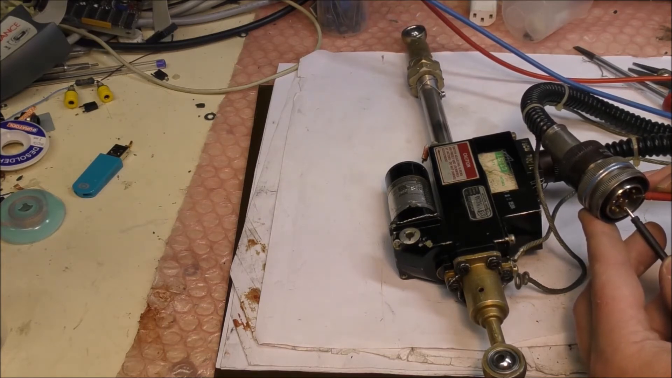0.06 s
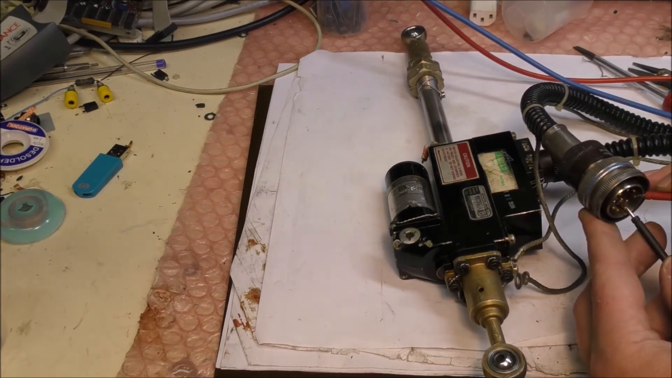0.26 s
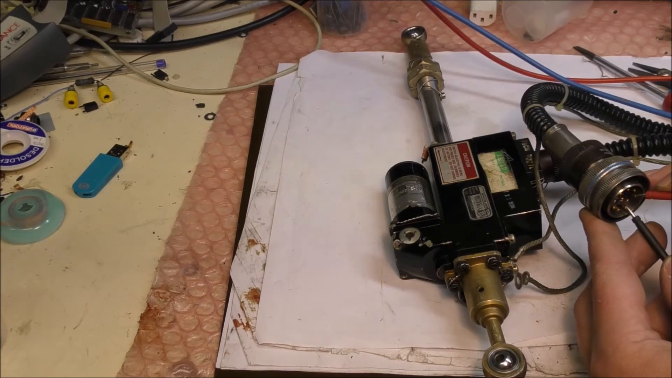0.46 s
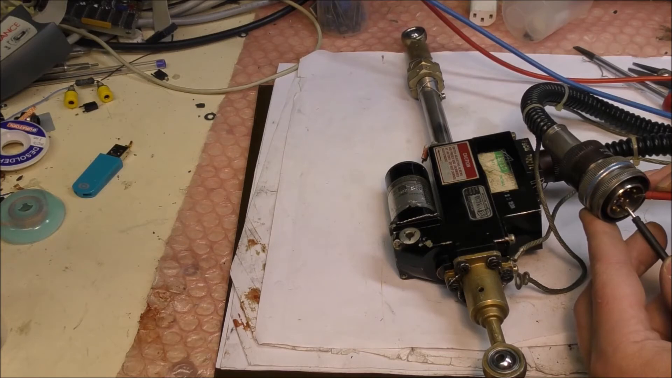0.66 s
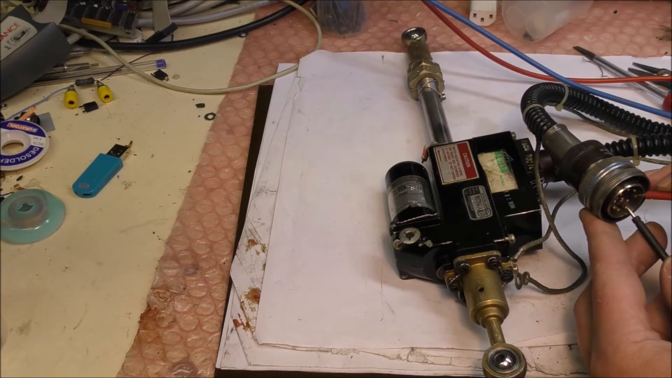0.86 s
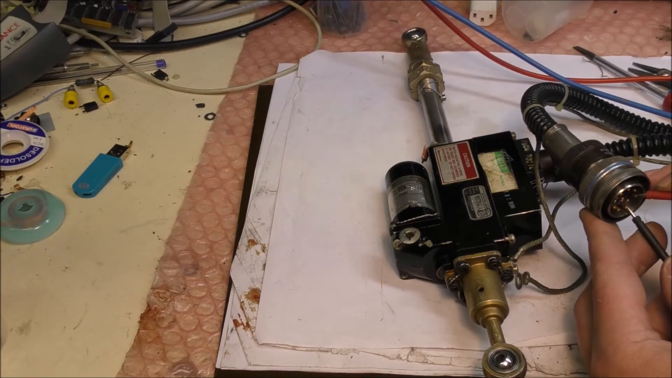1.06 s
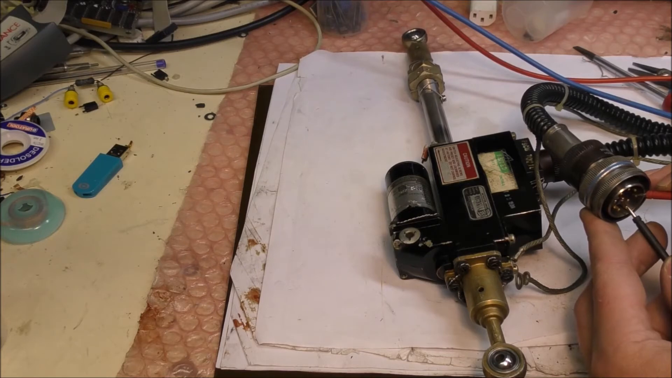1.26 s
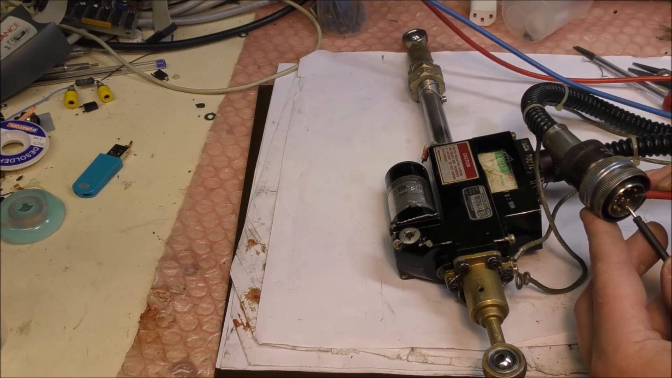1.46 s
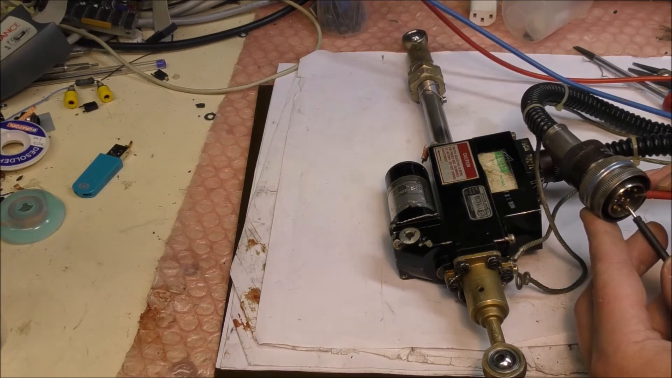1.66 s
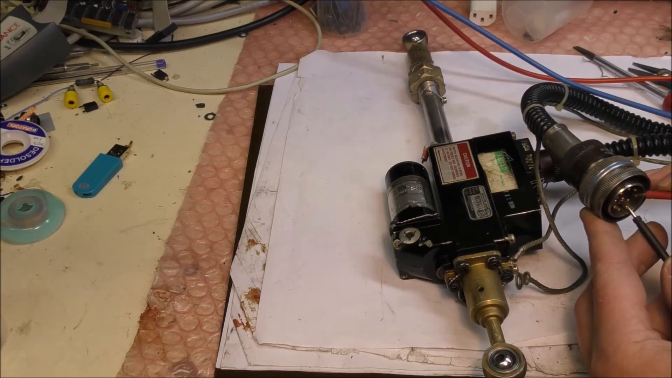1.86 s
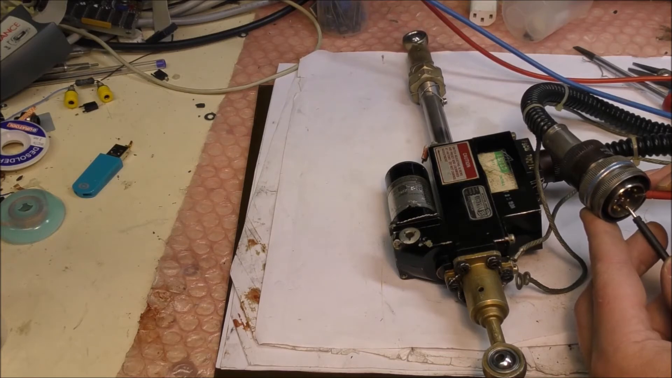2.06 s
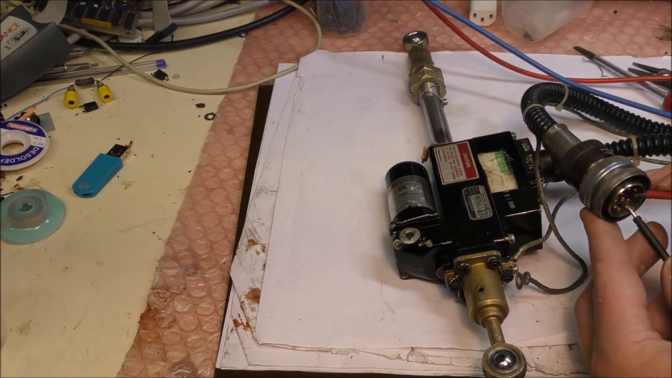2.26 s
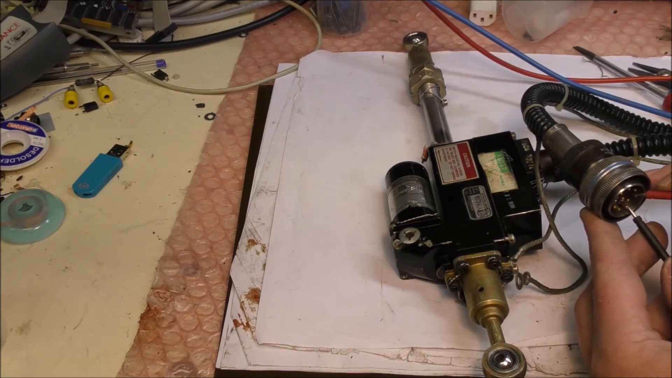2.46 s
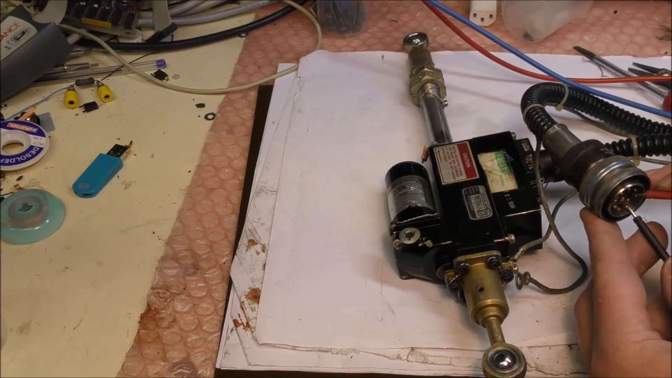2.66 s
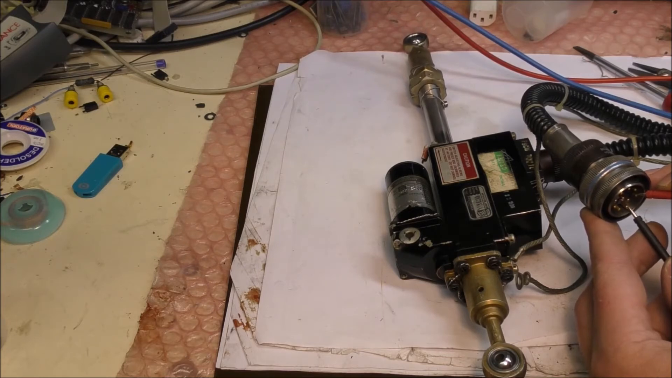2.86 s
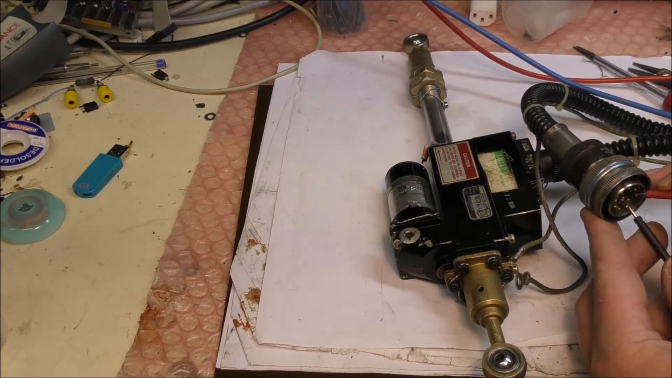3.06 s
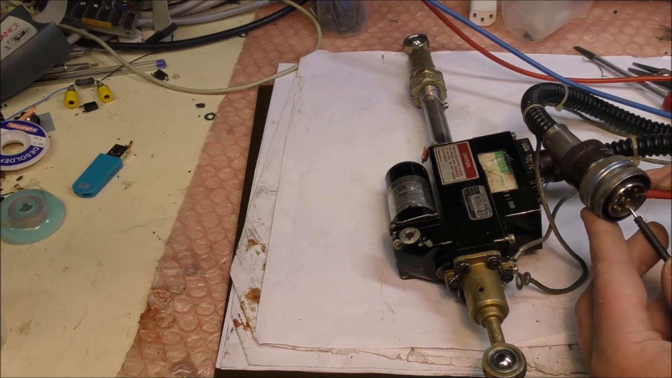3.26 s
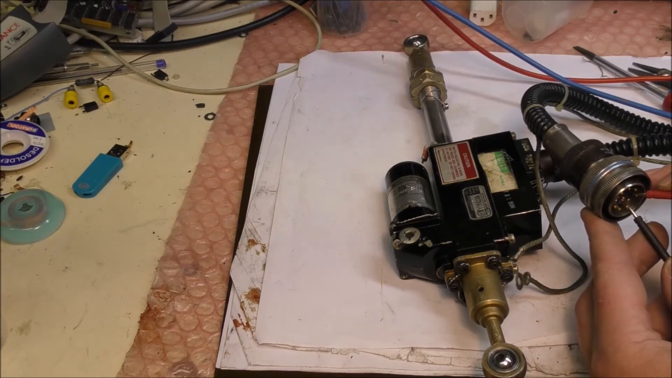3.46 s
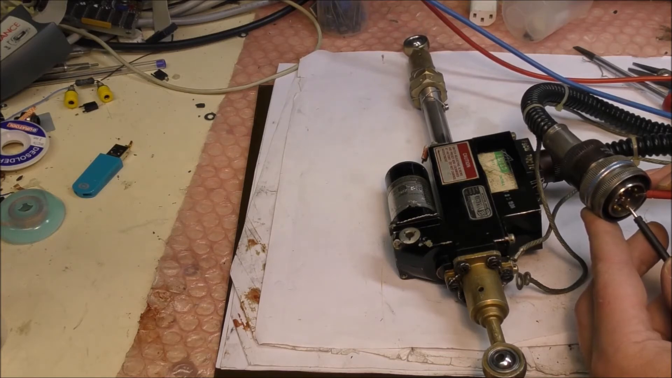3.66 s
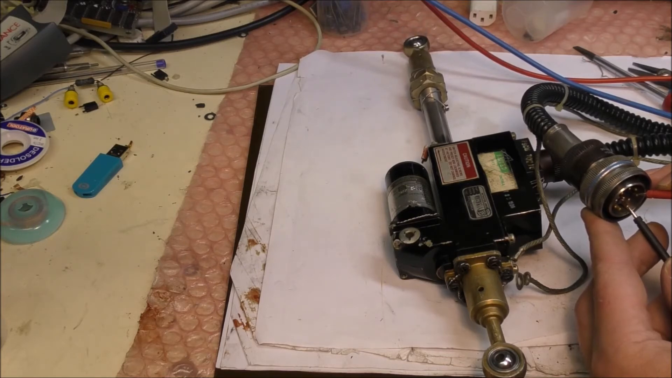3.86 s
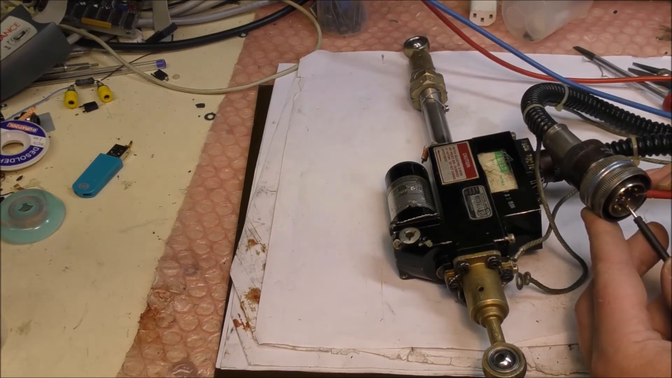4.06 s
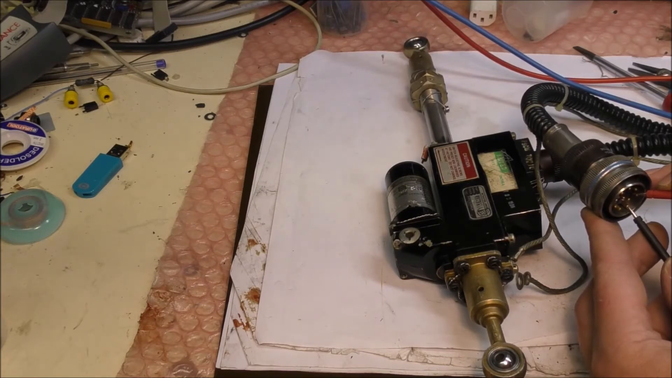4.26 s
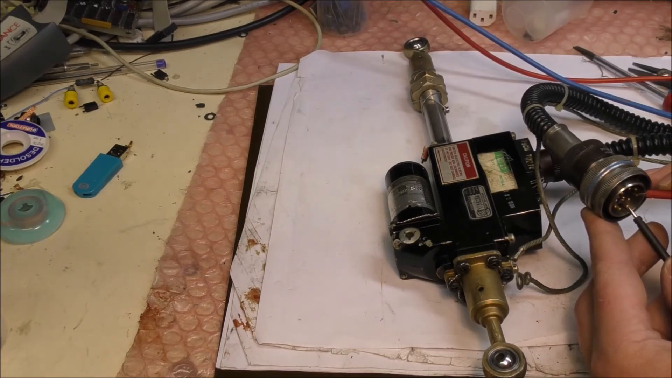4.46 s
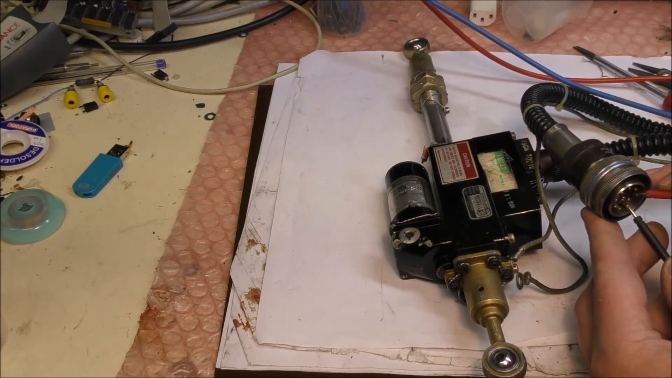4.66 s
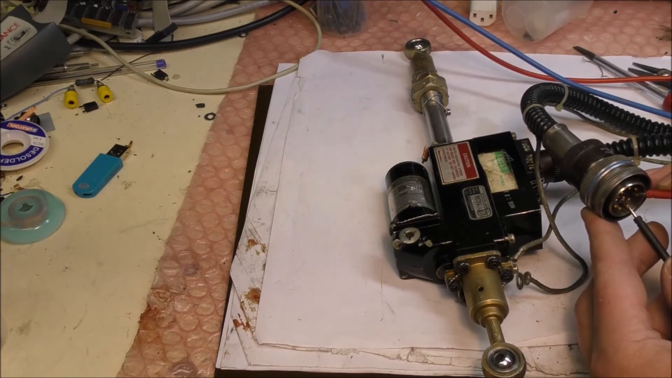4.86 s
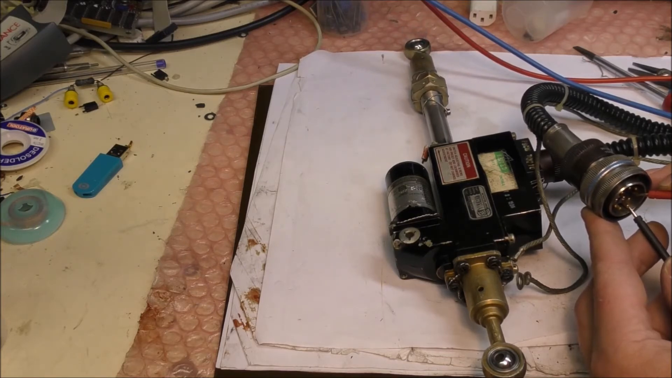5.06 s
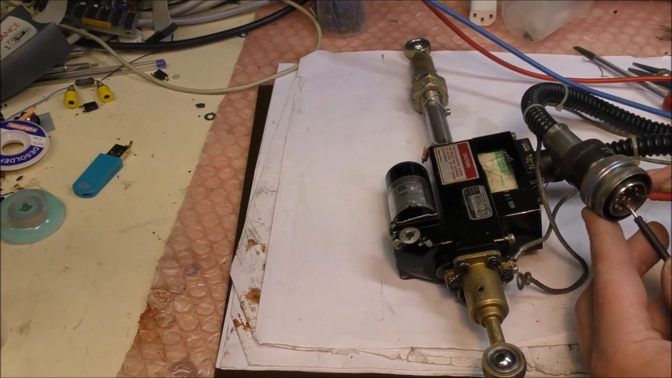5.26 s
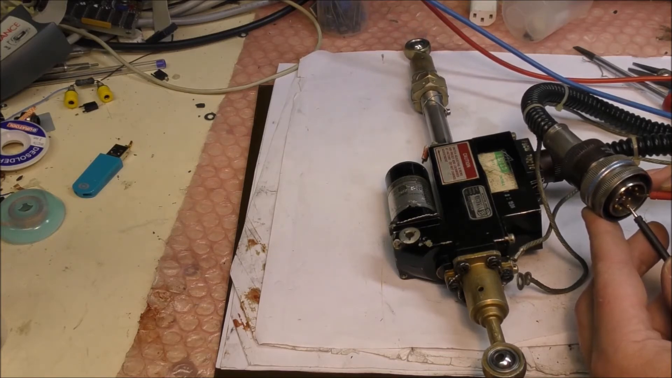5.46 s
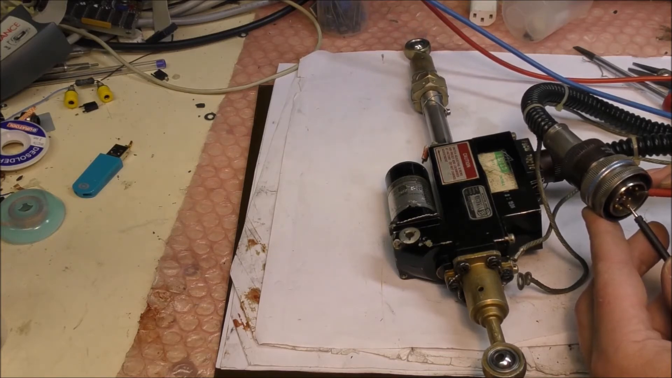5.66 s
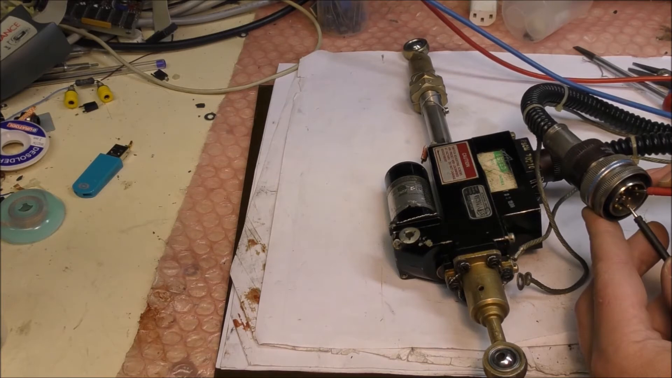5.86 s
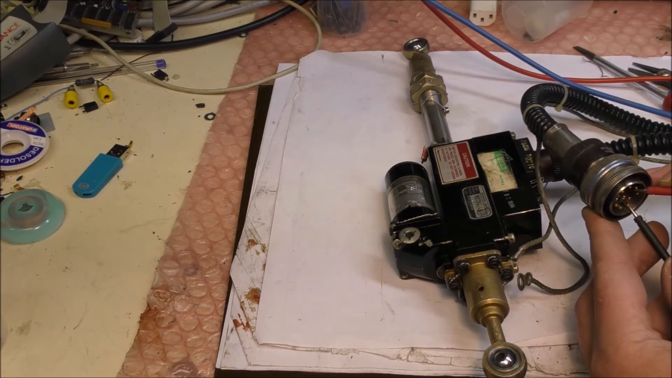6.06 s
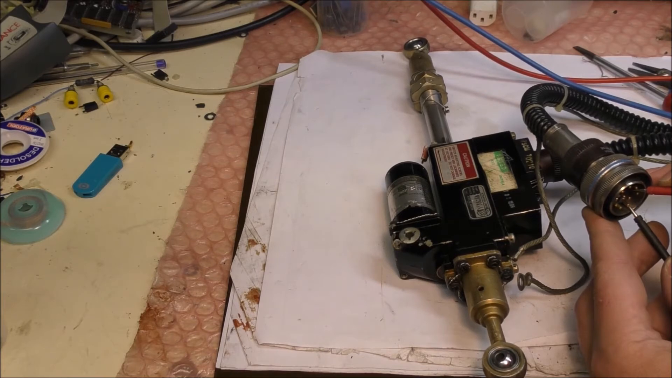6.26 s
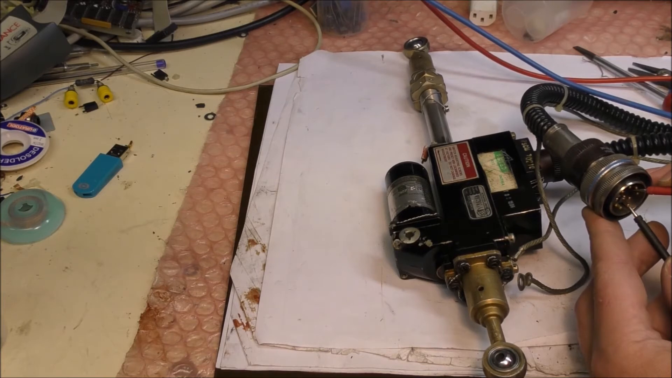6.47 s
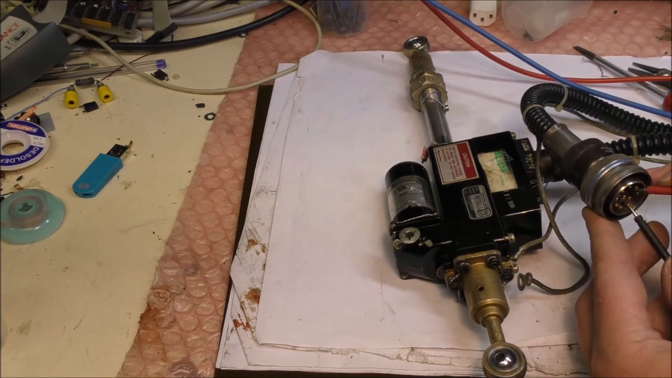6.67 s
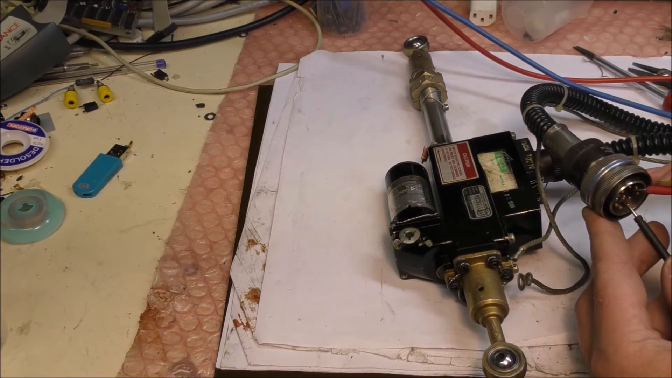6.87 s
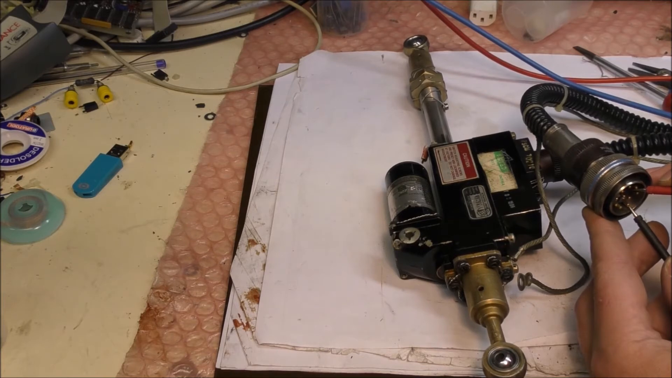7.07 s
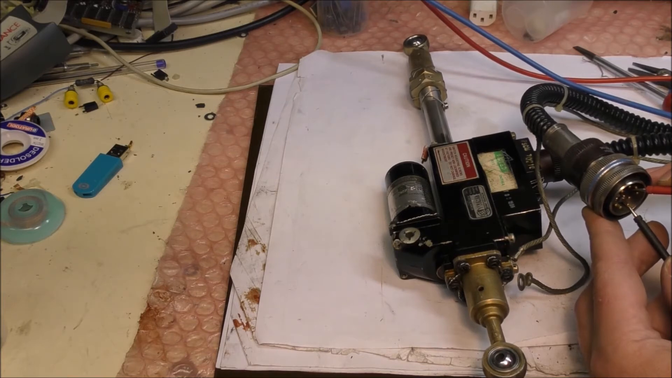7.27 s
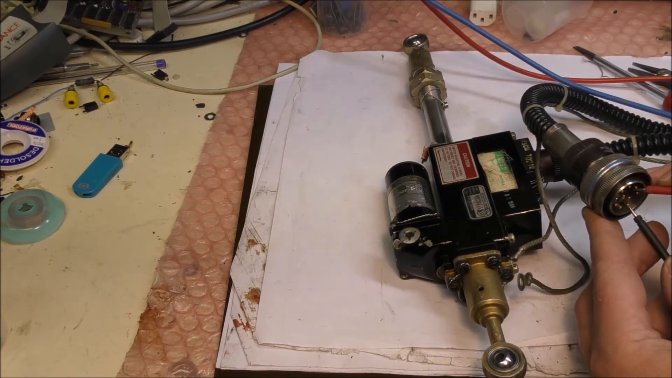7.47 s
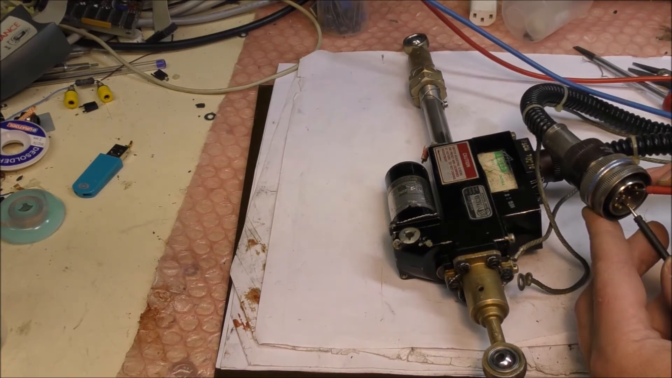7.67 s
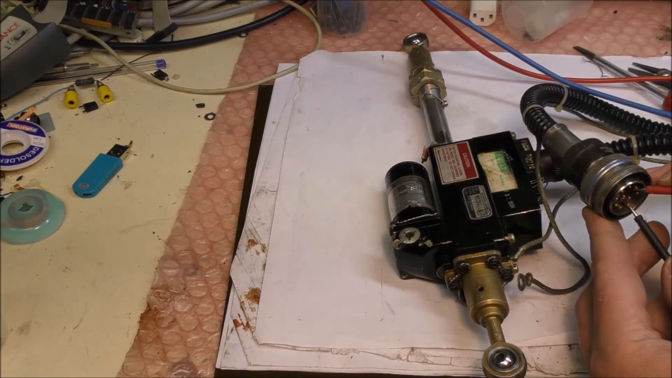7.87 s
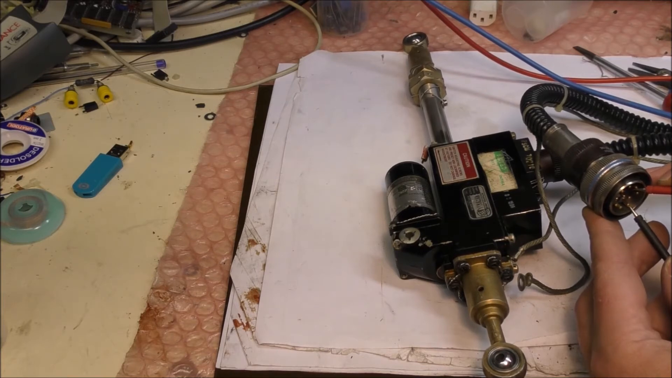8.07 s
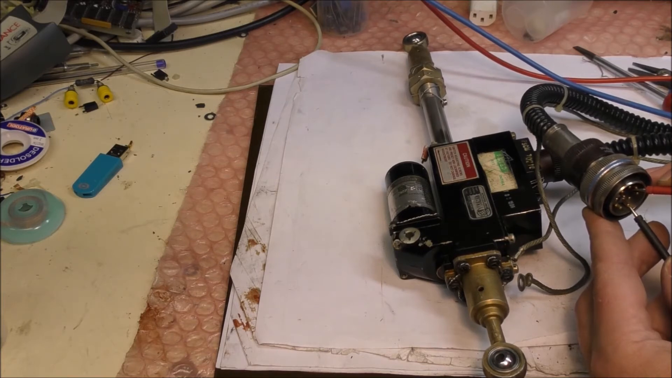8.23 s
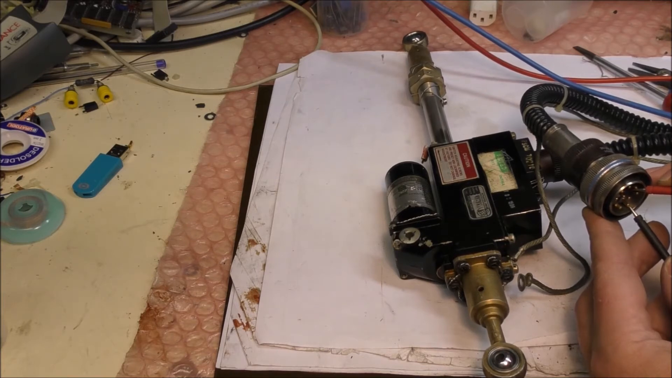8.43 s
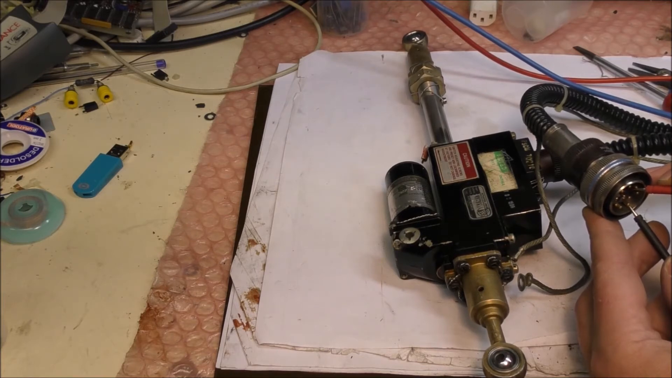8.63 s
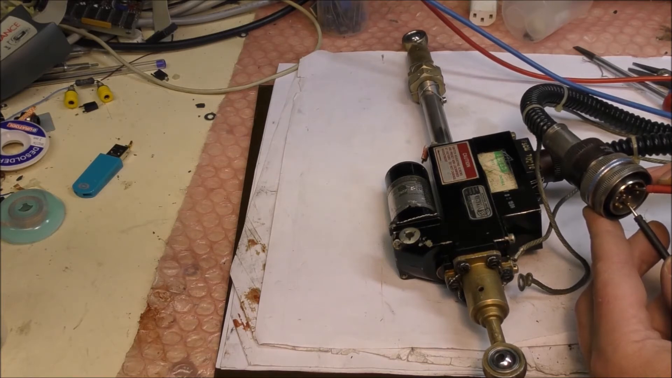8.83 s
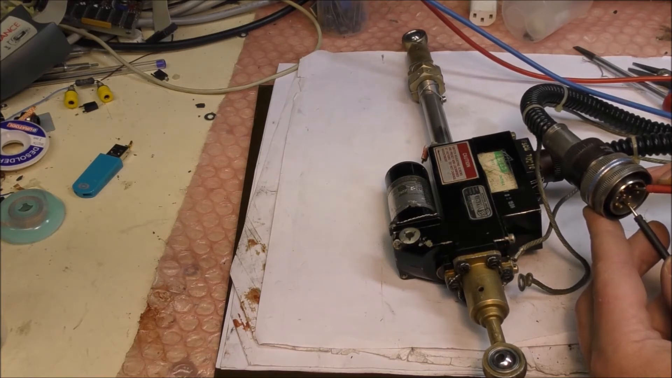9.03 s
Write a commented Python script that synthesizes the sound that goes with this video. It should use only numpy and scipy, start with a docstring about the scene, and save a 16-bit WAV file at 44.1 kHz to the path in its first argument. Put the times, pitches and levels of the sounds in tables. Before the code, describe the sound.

A small electric linear actuator whines close by on a workbench, already running, its nasal gear tone swaying about twice a second over rattle and brush fizz. Just before five seconds it brakes abruptly with several clacks, then a bright click. After a short quiet gap a knock starts it again; the whine climbs quickly and holds steady to the end. Small room, soft air.

```python
"""A small electric linear actuator on a workbench pulls its rod in, brakes, clicks, and after a pause pushes it out again.
A seven-tooth pinion on the motor shaft whines against a wheel four times its size: five tooth harmonics
cross sharp resonances while the speed sways with each turn of the screw.
Shaped noise makes the gear rattle and brush fizz, decaying modes and noise bursts the clacks and click;
a small workshop answers with a decaying noise echo under a soft rush of air."""
import sys
import numpy as np
from scipy import signal
from scipy.fft import rfft, irfft, next_fast_len
from scipy.io import wavfile
from scipy.ndimage import uniform_filter1d, map_coordinates

SR = 44100
rng = np.random.default_rng(int(sys.argv[2]) if len(sys.argv) > 2 else 0)


def waveform_to_disk(signal):
    """Save audio, clipped to [-1, 1], as 16-bit WAV at the path in sys.argv[1]."""
    frames = np.transpose(np.atleast_2d(signal))
    scaled = np.clip(frames, -1, 1) * 32767
    samples = np.round(scaled).astype(np.int16)
    wavfile.write(sys.argv[1], SR, samples)


N = 401310

# Weaker lines from the rotor and uneven teeth. Each row: multiple of the shaft rate,
# level in dB pulling, level in dB pushing, both before the stroke's gain.
ROTOR_LINES = [(4.94, -60, -63), (6.08, -61.5, -56), (8.97, -48.5, -47), (12, -53, -48.5), (13, -50, -46),
               (23, -54.5, -51), (25.1, -55, -45), (26, -37, -36), (27.04, -35, -46), (29, -55, -39),
               (31.35, -58, -40), (32.5, -61, -56), (32.9, -50.5, -54), (36, -48, -45.5), (42, -46, -44.5),
               (46.7, -58.5, -54), (48, -52.5, -57), (49.5, -48, -64), (51, -47.5, -69), (54.8, -52, -54),
               (56, -44, -46.5), (56.97, -43.5, -48), (69, -49, -39), (71.7, -50.5, -40.5), (72, -53, -63),
               (83, -55, -53), (86, -53.5, -56), (98, -49, -69)]
# Colour of the case shaken by the rattle. Each row: frequency in Hz, relative level in dB per Hz pulling,
# the same pushing.
CASE_COLOUR = [(40, -27, -28), (97, -19.5, -16), (150, -20, -18.5), (380, -25.5, -23), (580, -30.5, -32),
               (760, -18, -22), (938, -6.5, -3.5), (1340, -7, -4), (1650, -14.5, -13.5), (2050, 0.5, 0.5),
               (2256, -11, -8.5), (3310, -3, -1.5), (4060, 6, 7.5), (4210, -3, 0.5), (5320, 0.5, -1),
               (5790, -12, -9), (9100, -23, -21), (16000, -36.5, -40)]
# Colour of a metallic click. Each row: frequency in Hz, relative level in dB per Hz.
CLICK_COLOUR = [(500, -52.5), (850, -18), (1140, -1), (1400, -20), (1600, -11.5), (2830, -14), (3830, -6),
                (6310, -20.5), (8240, -9.5), (15500, -23)]

PINION_TEETH, WHEEL_RATIO = 7, 4
RATTLE_GROWS, FIZZ_GROWS = 0.64, 1.84  # power of the speed with which each grows


def amp(db):
    """Decibels to gain."""
    return 10 ** (np.asarray(db) / 20)


def unit(x):
    """Scale to rms 1."""
    return x / np.sqrt(np.mean(x ** 2) + 1e-20)


def along(points, hz):
    """Interpolate (Hz, value) points on a log frequency axis."""
    point_hz, values = np.transpose(points)
    return np.interp(np.log(hz + 1), np.log(point_hz + 1), values)


def wobble(rate):
    """A smooth random curve, rate knots a second."""
    coarse = np.linspace(0, N, N // 16)
    knots = rng.standard_normal(int(N * rate / SR) + 4)
    return np.interp(np.arange(N), coarse, map_coordinates(knots, [coarse * rate / SR]))


def filtered(x, response):
    """x times a response of frequency."""
    padded = next_fast_len(N + SR // 4)
    return irfft(rfft(x, padded) * response(np.fft.rfftfreq(padded, 1 / SR)), padded)[..., :N]


def coloured(x, spectrum):
    """x with a (Hz, dB) colour, at rms 1."""
    return unit(filtered(x, lambda hz: amp(along(spectrum, hz))))


def placed(x, pan_db):
    """A mono sound, pan_db louder on the left."""
    return np.array([x * amp(pan_db / 2), x * amp(-pan_db / 2)])


def swell(turns, depth_db):
    """A gain that peaks once a turn, depth_db above and below unity."""
    return amp(depth_db * np.cos(2 * np.pi * turns))


def surface(turns, size):
    """Fine random roughness around a wheel, met again on every turn."""
    bumps = rng.standard_normal(size)
    fine = bumps - uniform_filter1d(bumps, size=90, mode="wrap")
    return unit(map_coordinates(fine, [turns % 1 * size], mode="grid-wrap"))


def resonances(modes, hz):
    """Power sum of (Hz, width Hz, dB) resonances, as a gain at hz."""
    return np.sqrt(sum(amp(db) ** 2 / (1 + ((hz - centre) / width) ** 2) ** 2 for centre, width, db in modes))


def drive(speed, screw, start, stop):
    """Motion of one stroke: the screw binds once a turn, so the motor speed sways about its mean.

    Returns tooth rate in Hz, shaft turns, screw turns, lag behind the usual speed, travel 0-1, on-off gate."""
    t = np.arange(N) / SR
    knot_s, mean_hz = np.transpose(speed)
    fastest_s, first_turn_s, last_turn_s, first_sway_pct, last_sway_pct = screw
    travel = np.interp(t, [knot_s[0], knot_s[-1]], [0, 1])
    turns = np.cumsum(1 / np.interp(travel, [0, 1], [first_turn_s, last_turn_s])) / SR
    turns = turns - np.interp(fastest_s, t, turns)
    sway_pct = np.interp(travel, [0, 1], [first_sway_pct, last_sway_pct])
    sway = sway_pct / 100 * np.cos(2 * np.pi * turns)
    # the rotor's inertia rounds every change
    tooth_hz = uniform_filter1d(np.interp(t, knot_s, mean_hz) * (1 + sway), size=900)
    usual_hz = np.median(tooth_hz[(t > knot_s[0]) & (t < knot_s[-1])])
    lag = 1 - tooth_hz / usual_hz
    jitter = (.0014 + .015 * np.maximum(lag, 0)) * wobble(110)  # a slow motor runs unevenly
    shaft = np.cumsum(tooth_hz * (1 + jitter)) / SR / PINION_TEETH
    fade_in = np.clip((t - start) / .004, 0, 1)
    fade_out = amp(-60 * np.maximum(t - stop, 0) / .12)
    return tooth_hz, shaft, turns, lag, travel, fade_in * fade_out


def whine(tooth_hz, shaft, lag, travel, teeth, ring, throb=1):
    """Tooth harmonics swell across resonances; uneven tooth loads roughen them, standing waves swing them sideways."""
    out = np.zeros((2, N))
    fast_pct = np.clip(-100 * lag, -2, 2)  # above the usual speed
    slow = 1 + 3 * np.maximum(lag, 0)  # rougher when slow
    grid_hz = np.arange(SR // 4)
    response = resonances(ring, grid_hz)
    for k, (first_db, last_db, half_speed_loss_db, flutter_db, rough, pan_db, swing_db) in enumerate(teeth, 1):
        db = first_db + (last_db - first_db) * travel
        db = db - half_speed_loss_db * 2 * np.maximum(lag, 0) + flutter_db * wobble(22)
        load = 1 + rough * slow * (wobble(110) + 1j * wobble(110))
        load = load / np.sqrt(1 + 2 * (rough * slow) ** 2)
        phase_turns = k * PINION_TEETH * shaft + rng.random()
        line = np.sqrt(2) * np.imag(load * np.exp(2j * np.pi * phase_turns))
        gain = amp(db) * np.interp(k * tooth_hz, grid_hz, response)
        if k == 1:
            gain = gain * throb
        out += placed(gain * line, pan_db + swing_db * fast_pct)
    return out


def hum(shaft, turns, lag, travel, rule):
    """Rotor imbalance shakes the bench once a shaft turn, growing with speed, swelling with each screw turn."""
    first_db, last_db, swell_db, late_turns = rule
    gain = amp(first_db + (last_db - first_db) * travel) * swell(turns - late_turns, swell_db) * (1 - lag) ** 2
    return gain * np.sqrt(2) * np.sin(2 * np.pi * shaft)


def singing(lag):
    """The rotor lines fade as soon as the motor slows."""
    return amp(-60 * np.maximum(lag, 0))


def shaft_lines(shaft, lines, waver_db):
    """Rotor slots and uneven teeth add wavering multiples of the shaft rate."""
    out = np.zeros(N)
    for order, db in lines:
        out += amp(db + waver_db * wobble(16)) * np.sin(2 * np.pi * (order * shaft + rng.random()))
    return out


def rattle(shaft, spectrum, tooth_db, shaft_db, wheel_db):
    """Tooth flanks scrape and slap in the case, harder with each tooth, shaft turn and wheel turn."""
    wheel = shaft / WHEEL_RATIO
    scrape = .45 * surface(shaft, size=300) + .65 * surface(wheel, size=1100) + .62 * rng.standard_normal(N)
    load = swell(PINION_TEETH * shaft, tooth_db) * swell(shaft, shaft_db)
    load *= swell(2 * shaft + 0.14, 1.0) * swell(wheel, wheel_db)
    return coloured(scrape * load * amp(1.25 * wobble(25)), spectrum)


def fizzy(x):
    """x through the resonances of the motor can, at rms 1."""
    # Each row: centre in Hz, width in Hz, relative level in dB.
    can_modes = [(6300, 330, -7), (7370, 240, -3), (8250, 250, -6.5), (8680, 330, -4), (9700, 420, -4),
                 (10130, 400, 1), (10330, 450, 3), (11500, 710, 0), (11800, 300, -6), (12400, 400, -4),
                 (13220, 320, -0.5), (14070, 250, -2.5), (14680, 300, -7), (15250, 206, -11),
                 (15620, 248, -2)]
    return unit(filtered(x, lambda hz: resonances(can_modes, hz)))


def brushes(shaft, spark_db):
    """The two brushes rub over the commutator and spark unevenly."""
    rub = .5 * surface(shaft, size=300) + .85 * rng.standard_normal(N)
    return fizzy(rub * swell(shaft, 0.73) * swell(2 * shaft, 0.89) * amp(spark_db * wobble(900)))


def pull():
    """Pulling in, the gears throb with the shaft and the wheel until the motor brakes: (whine, clatter)."""
    # Speed sags under load, then brakes. Each row: time in seconds, mean tooth rate in Hz.
    speed = [(0, 1033), (4.72, 1005), (4.82, 979), (4.845, 925), (4.865, 766), (4.89, 556)]
    # Screw: a fastest moment in seconds, turn length in seconds at stroke start and end, sway in percent at both.
    screw = (.2, .463, .516, 2.1, 1.15)
    # Tooth harmonics 1-5. Each row: relative level in dB at stroke start, at its end, loss in dB at half speed,
    # flutter in dB, roughness 0-1, left over right in dB, its swing in dB per percent of speed.
    teeth = [(-1, 1, 2, 0.4, 0.03, -4, 0.7), (-1.5, -3.2, -4.5, 3, 0.18, 1, -2.3),
             (1.5, -2, 6.5, 2.5, .24, 0, -0.5), (-3.5, 1.5, 24, 1.5, 0.17, -0.5, -1),
             (1, -8, 25.5, 1.5, .3, 3.5, 0.5)]
    # Case and bench. Each row: centre in Hz, width in Hz, level in dB on the peak before the harmonic's own.
    ring = [(965, 19.4, -17.5), (994.7, 6, -26), (1025.8, 17.5, -24), (1053.6, 14, -24), (1450, 320, -26.5),
            (1968, 33, -23), (2027, 21.4, -28), (2088, 12.4, -34), (2898, 67, -31.5), (3133, 89, -37),
            (3918, 99, -22), (4057, 64, -26.5), (4210, 80, -36.5), (4750, 80, -23), (5260, 220, -44)]
    # Hum: level in dB at stroke start, at its end, swell in dB per screw turn, turns after the fastest moment.
    hum_rule = (-59.5, -52, 4.2, .6)
    brake_s, brake_length_s, brake_db = 4.843, .014, 4
    throb_db, throb_turns = 1.5, 0.26  # depth at stroke start, screw turns after the fastest moment

    tooth_hz, shaft, turns, lag, travel, gate = drive(speed, screw, start=-1, stop=4.88)
    # the lowest harmonic throbs twice a screw turn
    throb = swell(2 * (turns - throb_turns), throb_db * (1 - travel))
    tone = whine(tooth_hz, shaft, lag, travel, teeth, ring, throb)
    tone = tone + hum(shaft, turns, lag, travel, hum_rule)

    lines = amp(1.0) * shaft_lines(shaft, np.array(ROTOR_LINES)[:, [0, 1]], waver_db=3.5)
    side_tones = shaft_lines(shaft, [(26.02, -37.5), (27.05, -35.5)], waver_db=4.5)
    lines += amp(-13 + 15 * travel) * side_tones  # they grow as the rod comes in
    lines *= singing(lag)

    # braking throws the gears against each other
    braking = np.exp(-((np.arange(N) / SR - brake_s) / brake_length_s) ** 2)
    gears = rattle(shaft, np.array(CASE_COLOUR)[:, [0, 1]], tooth_db=3.0, shaft_db=1.0, wheel_db=2.5)
    gears = amp(-27.5 + brake_db * braking) * (1 - lag) ** RATTLE_GROWS * gears
    fizz = amp(-32.5) * (1 - lag) ** FIZZ_GROWS * swell(turns, 0.48) * brushes(shaft, spark_db=0.5)
    return gate * tone, gate * (lines + gears + fizz)


def small_modes(x, ripple_db, spacing_hz):
    """Many small modes of the case ripple its treble; gliding lines flicker as they cross them."""
    ripple = rng.standard_normal(2000)

    def response(hz):
        depth_db = ripple_db * np.clip(hz / 6000, 0, 1)
        return amp(depth_db * map_coordinates(ripple, [hz / spacing_hz], mode="mirror"))

    return filtered(x, response)


def workshop(x):
    """Bench and walls answer with decaying noise, partly different left and right."""
    # Each row: frequency in Hz, t60 in seconds, relative level in dB, side over mid.
    room_bands = [(150, .6, 0, .9), (1000, .32, 0, .7), (4000, .27, -1, .6), (9000, .34, 0, .5),
                  (14000, .32, -1, 1.05)]
    hz, t, z = signal.stft(rng.standard_normal((2, SR * 2 // 3)), SR, nperseg=256)
    t60, db, width = [along(np.array(room_bands)[:, [0, k]], hz)[:, None] for k in range(1, 4)]
    mid, side = z * amp(db - 60 * t / t60)
    tail = signal.istft(np.array([mid + width * side, mid - width * side]), SR, nperseg=256)[1]
    delayed = np.pad(x, (150, 0))[None]  # samples
    return signal.fftconvolve(delayed, tail / np.linalg.norm(tail[0]), axes=1)[:, :N]


def air():
    """The soft rush of the quiet workshop: steady coloured noise, wide in stereo."""
    # Each row: frequency in Hz, relative level in dB per Hz.
    air_colour = [(12, -58.5), (20, -23), (171, -5), (196, -6), (266, -13), (298, -4.5), (333, -17),
                  (372, -5.5), (478, -14.5), (565, -25.5), (631, -23), (788, -25.5), (1580, -18.5),
                  (5850, -36), (15500, -35.5)]
    mid, side = coloured(rng.standard_normal((2, N)), air_colour)
    return amp(-57) * np.array([mid + .5 * side, mid - .5 * side])


def clacks(click_db, knock_db, click_t60):
    """Play in the gears is taken up with clacks: a short metallic click and a knock of the housing each."""
    # Each row: start in seconds, level in dB before the common gains, knock over that level in dB.
    clack_events = [(4.7535, -17, -8), (4.8637, -19, -6), (4.8831, -23, 0), (4.9228, -24, -14),
                    (5.8718, -19, 1.5), (5.9386, -27, 0)]
    # Each row: frequency in Hz, relative level in dB, t60 in seconds.
    housing_modes = [(1010, -1, 0.029), (1168, -9, .04), (1850, -6.5, 0.027), (2055, -6, 0.027)]
    click_gain, knocks = np.zeros(N + SR), np.zeros(N + SR)
    t = np.arange(SR // 4) / SR
    for start_s, db, low_db in clack_events:
        first = round(start_s * SR)
        ring = sum(amp(level_db - 60 * t / t60) * np.sin(2 * np.pi * (hz * t + rng.random()))
                   for hz, level_db, t60 in housing_modes)
        knocks[first:][:len(t)] += amp(db + low_db + knock_db) * ring * (1 - np.exp(-t / 0.00086))
        click_gain[first:][:len(t)] += amp(db + click_db - 60 * t / click_t60)
    return knocks[:N] + click_gain[:N] * coloured(rng.standard_normal(N), CLICK_COLOUR)


def stop_click(db, rise, t60):
    """After the stop a spring-loaded part snaps back: a short, bright noise burst."""
    click_s = 5.0385
    age = np.maximum(np.arange(N) / SR - click_s, 0)
    envelope = amp(db - 60 * age / t60) * (1 - np.exp(-age / rise))
    return envelope * coloured(rng.standard_normal(N), CLICK_COLOUR)


def take_up(start, end, db):
    """The motor first turns freely through the play in the gears: a brief coloured noise."""
    t = np.arange(N) / SR
    gate = np.clip((t - start) / 0.0024, 0, 1) * np.clip((end - t) / .01, 0, 1)
    colour = [(400, -15), (1200, -4), (2200, -12), (4000, -6.5), (6500, -15), (15000, -15)]  # (Hz, dB)
    return amp(db) * gate * coloured(rng.standard_normal(N), colour)


def push():
    """Pushing out, the motor runs up and the other tooth flanks slap, tooth by tooth: (whine, clatter)."""
    # Speed runs up again. Each row: time in seconds, mean tooth rate in Hz.
    speed = [(5.885, 505.6), (5.96, 557.6), (6.02, 739), (6.07, 835), (6.12, 896), (6.19, 970.5),
             (6.29, 1022), (6.47, 1067), (9.1, 1077)]
    # Screw: a fastest moment in seconds, turn length in seconds at stroke start and end, sway in percent at both.
    screw = (6.65, .458, .45, 1.6, 2.1)
    # Tooth harmonics 1-5. Each row: relative level in dB at stroke start, at its end, loss in dB at half speed,
    # flutter in dB, roughness 0-1, left over right in dB, its swing in dB per percent of speed.
    teeth = [(-1.8, 2.5, 3, 0.53, 0.028, -3, 0), (-0.49, -1, 6.5, 1.5, 0.24, -3, 3.5),
             (-0.86, -1.5, 2, 1.9, .23, 0.5, 1), (-1.21, 0, 20, 1.4, 0.16, 0, 0),
             (-0.69, -3, 18, 0.9, .27, 0, 2)]
    # Case and bench. Each row: centre in Hz, width in Hz, level in dB on the peak before the harmonic's own.
    ring = [(800, 110, -41), (976, 42, -25), (1025, 22, -26.5), (1082.6, 30, -31.5), (1167, 52, -22),
            (1550, 180, -32.5), (2082, 68, -33.5), (2150, 23, -33), (2720, 150, -35), (3000, 100, -32),
            (3152, 43, -35), (3285, 25, -35), (3750, 200, -31), (4202, 114, -28), (4300, 34, -30.5),
            (5303, 160, -32)]
    # Hum: level in dB at stroke start, at its end, swell in dB per screw turn, turns after the fastest moment.
    hum_rule = (-60, -56, 6.5, .13)

    t = np.arange(N) / SR
    tooth_hz, shaft, turns, lag, travel, gate = drive(speed, screw, start=5.875, stop=10)
    tone = whine(tooth_hz, shaft, lag, travel, teeth, ring) + hum(shaft, turns, lag, travel, hum_rule)

    loaded = np.interp(t, [6.31, 6.46], [0, 1])  # the screw takes up its load
    # until then high tooth lines sing out
    free = shaft_lines(shaft, [(56, -43), (70, -29.5), (84, -38)], waver_db=2.5)
    lines = shaft_lines(shaft, np.array(ROTOR_LINES)[:, [0, 2]], waver_db=3.5)
    lines = amp(2.0) * (0.28 + 0.53 * loaded) * lines
    # still higher ones sweep through the can's resonances
    high_teeth = [(PINION_TEETH * k, 0) for k in range(11, 21)]
    fan = amp(-43) * (1 - lag) ** FIZZ_GROWS * fizzy(shaft_lines(shaft, high_teeth, waver_db=7))

    slap_db = np.interp(t, [6.28, 6.35], [-30, -27.3])  # the flanks slap harder as the load arrives
    gears = rattle(shaft, np.array(CASE_COLOUR)[:, [0, 2]], tooth_db=3, shaft_db=1.7, wheel_db=0.7)
    gears = amp(slap_db) * (1 - lag) ** RATTLE_GROWS * gears
    fizz = amp(-33.5) * (1 - lag) ** FIZZ_GROWS * brushes(shaft, spark_db=1.5)
    unloaded = (1 - loaded) * (singing(lag) * free + fan)
    return gate * tone, gate * (singing(lag) * lines + unloaded + gears + fizz)


def scene():
    """The actuator close by, its room and the room's air."""
    (whine_in, clatter_in), (whine_out, clatter_out) = pull(), push()
    tone = whine_in + whine_out
    contacts = clacks(click_db=-8, knock_db=1.5, click_t60=0.046)
    contacts = contacts + take_up(start=5.838, end=5.882, db=-35.0)
    clatter = small_modes(clatter_in + clatter_out + contacts, ripple_db=2, spacing_hz=60)
    click = stop_click(db=-33.5, rise=0.0012, t60=0.1)
    room = workshop(amp(-9) * clatter + amp(-15) * tone.mean(axis=0) + amp(-10) * click)
    return tone + amp(-0.21) * placed(clatter, pan_db=-0.3) + click + room + air()


def record(dry):
    """Cut everything above a band limit with a steep linear slope."""
    top_hz, slope_hz = 15780, 250
    return filtered(dry, lambda hz: np.clip((top_hz - hz) / slope_hz + .5, 0, 1))


dry = scene()
out = record(dry)
waveform_to_disk(out)
```